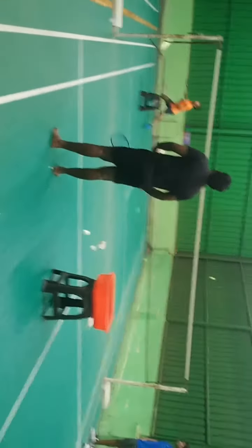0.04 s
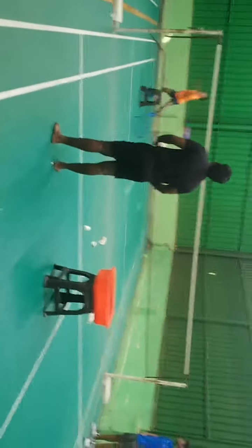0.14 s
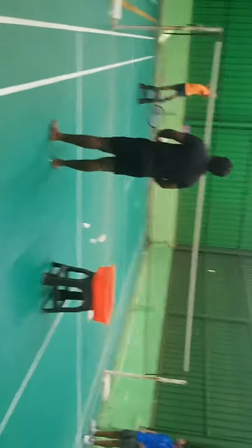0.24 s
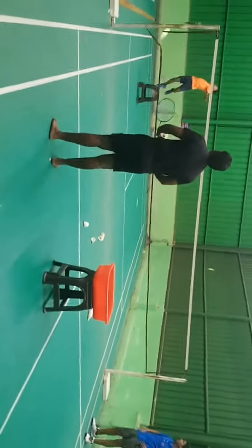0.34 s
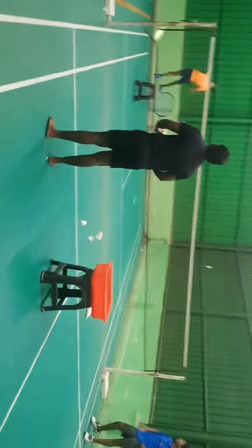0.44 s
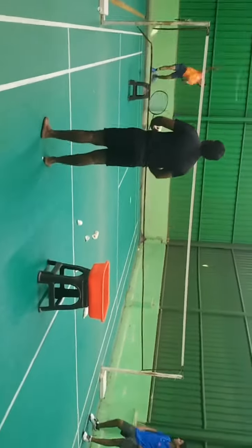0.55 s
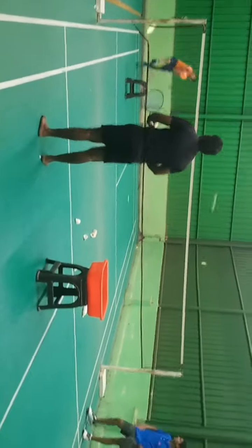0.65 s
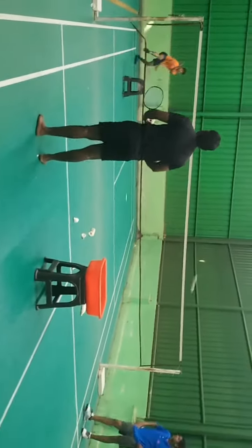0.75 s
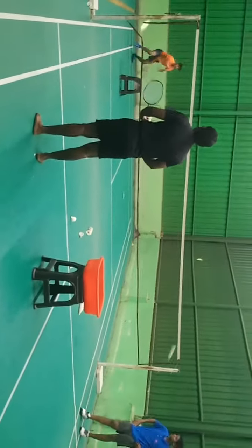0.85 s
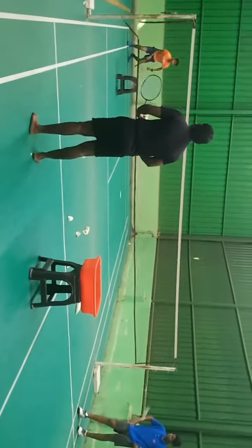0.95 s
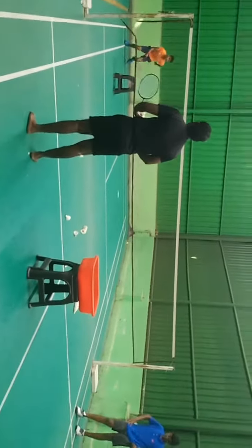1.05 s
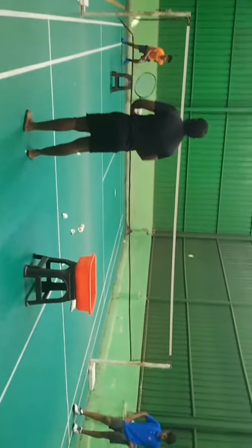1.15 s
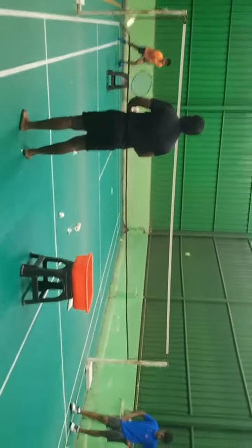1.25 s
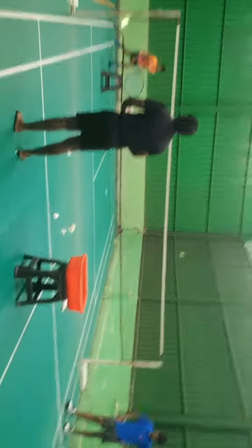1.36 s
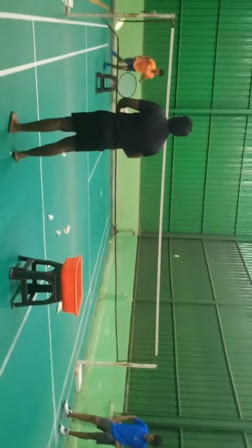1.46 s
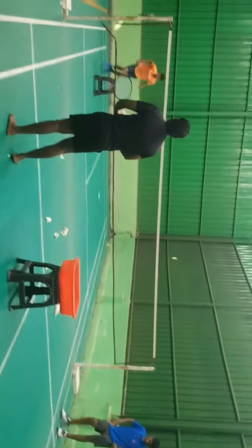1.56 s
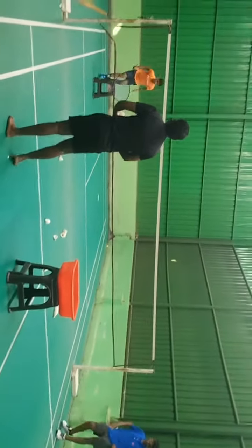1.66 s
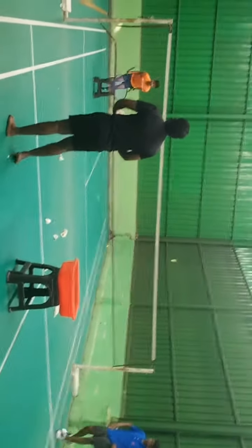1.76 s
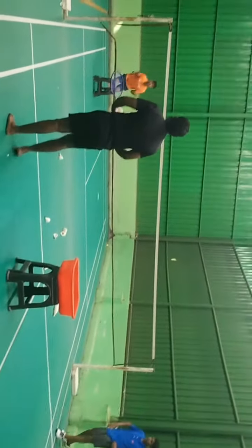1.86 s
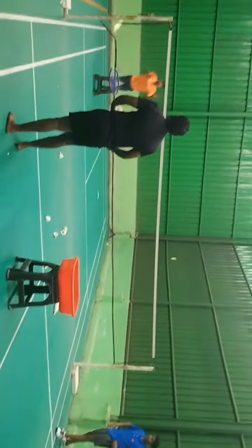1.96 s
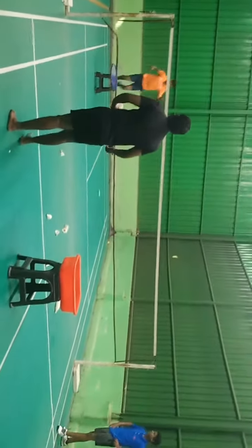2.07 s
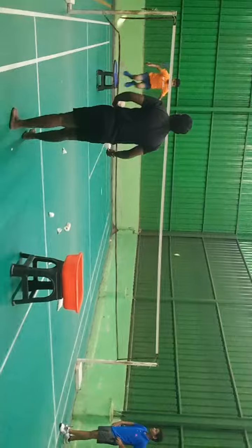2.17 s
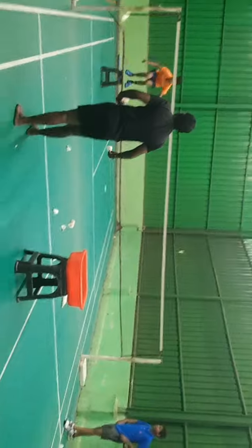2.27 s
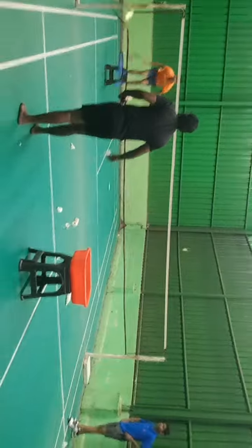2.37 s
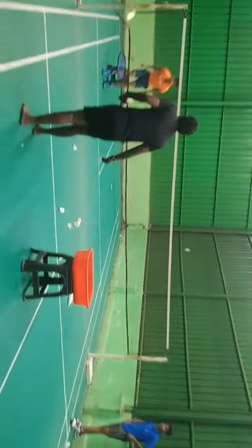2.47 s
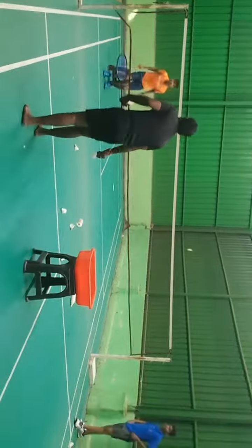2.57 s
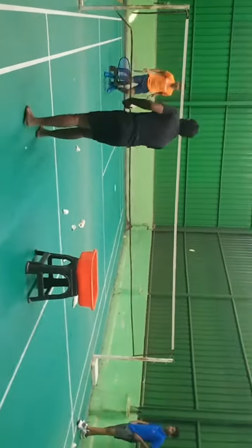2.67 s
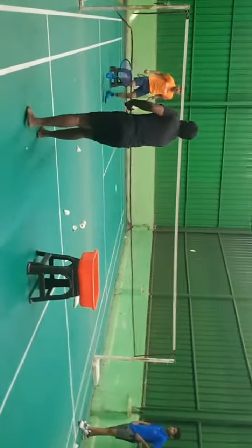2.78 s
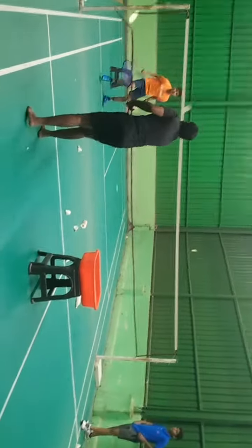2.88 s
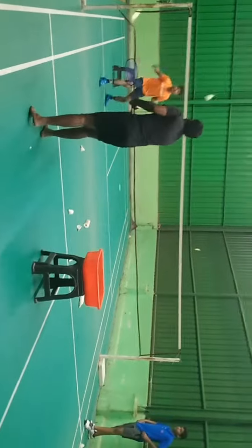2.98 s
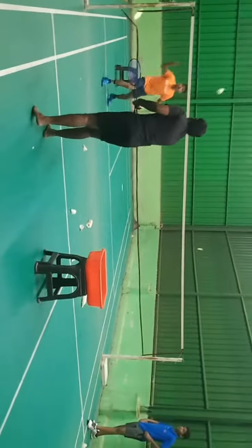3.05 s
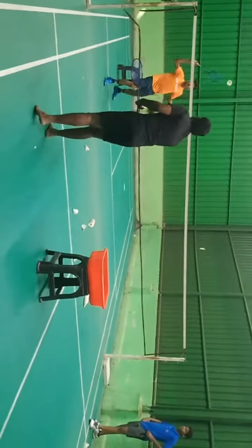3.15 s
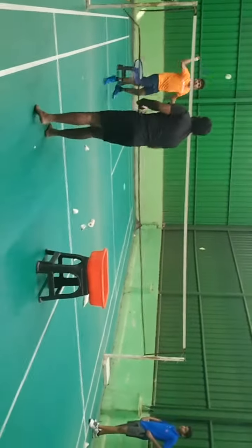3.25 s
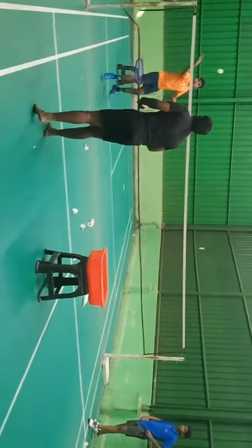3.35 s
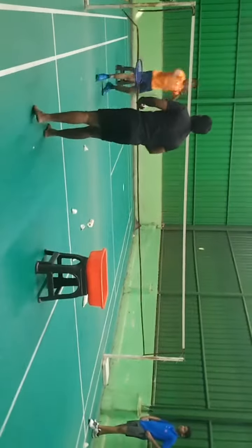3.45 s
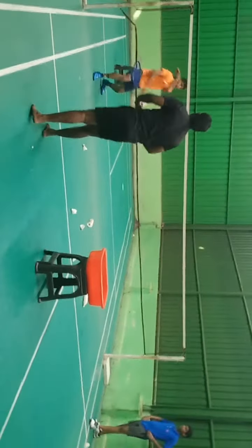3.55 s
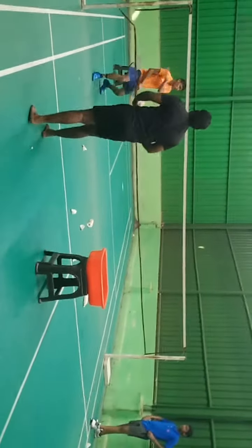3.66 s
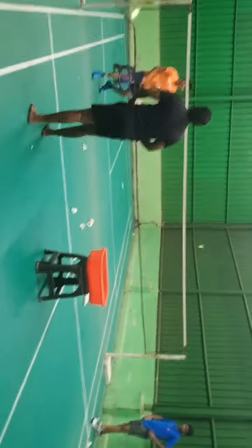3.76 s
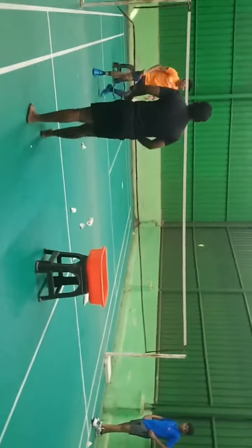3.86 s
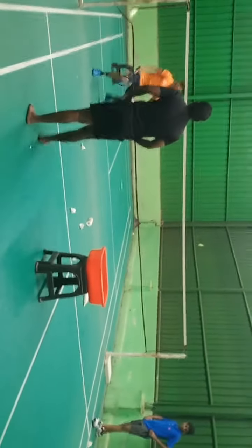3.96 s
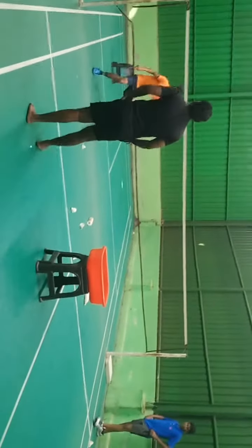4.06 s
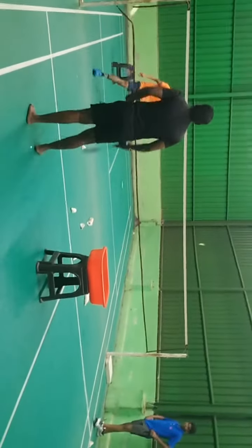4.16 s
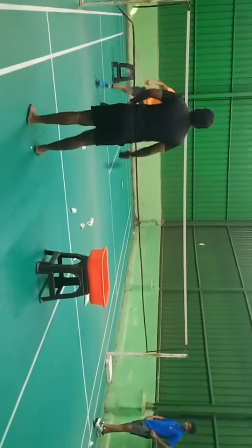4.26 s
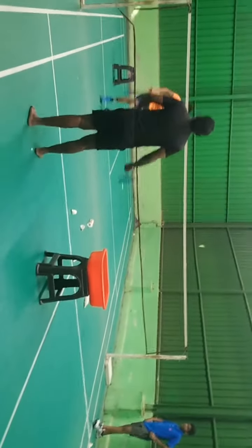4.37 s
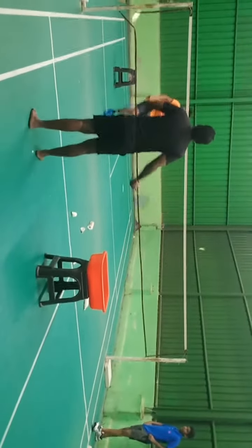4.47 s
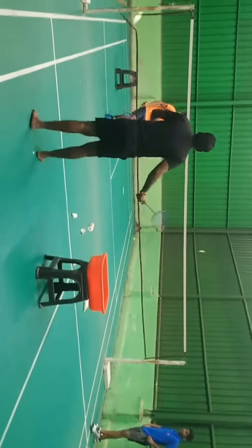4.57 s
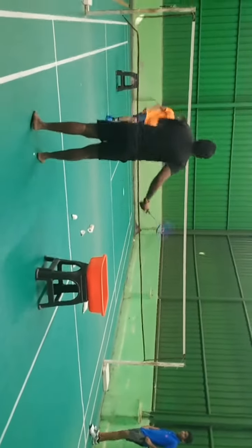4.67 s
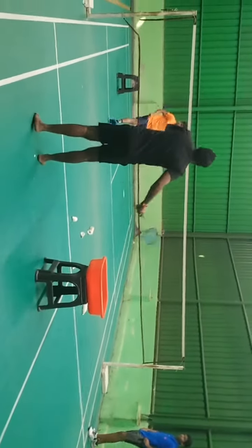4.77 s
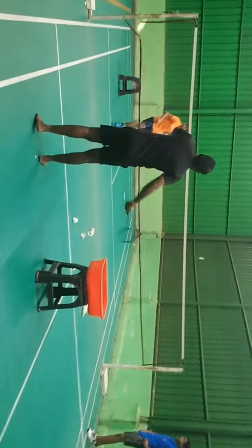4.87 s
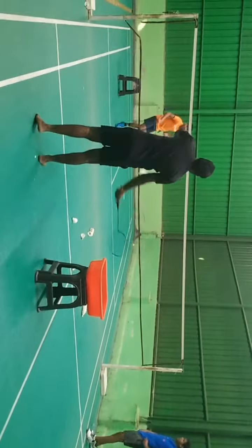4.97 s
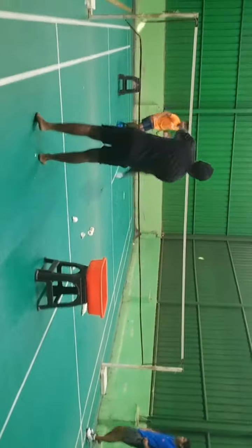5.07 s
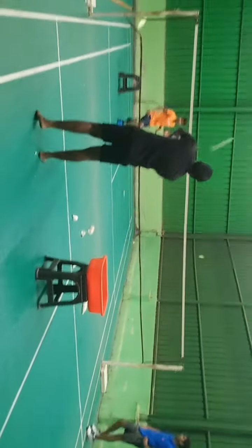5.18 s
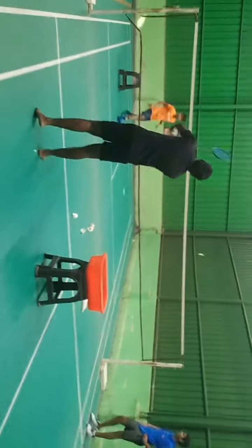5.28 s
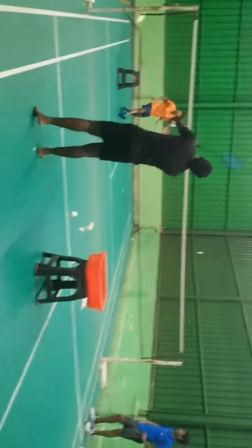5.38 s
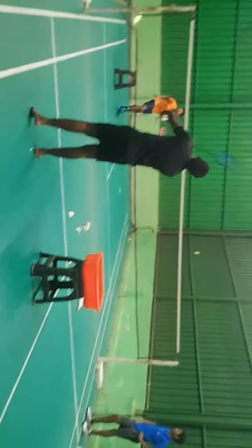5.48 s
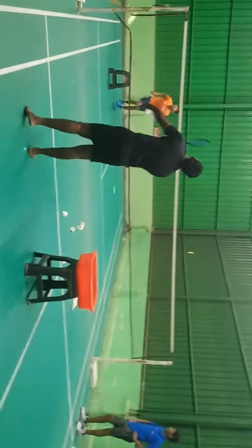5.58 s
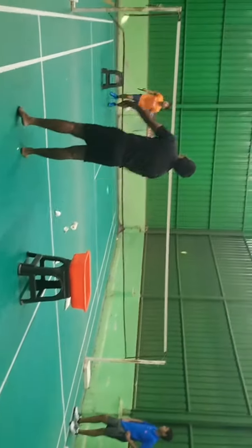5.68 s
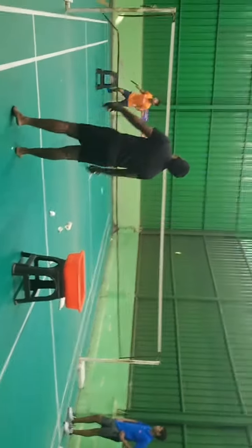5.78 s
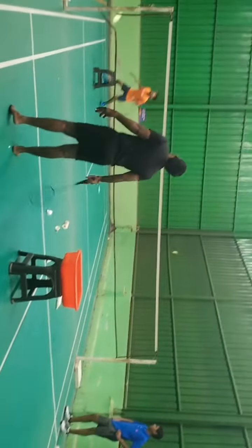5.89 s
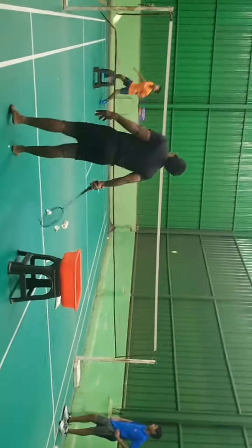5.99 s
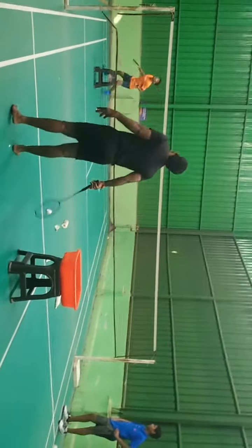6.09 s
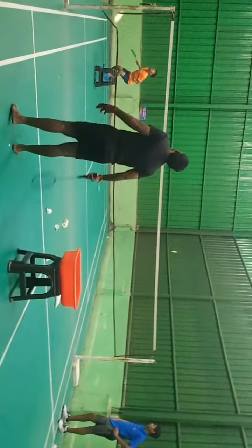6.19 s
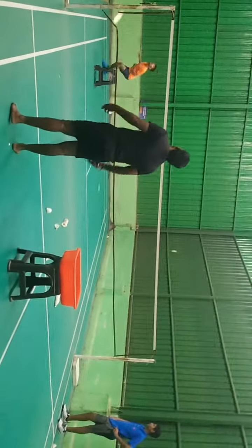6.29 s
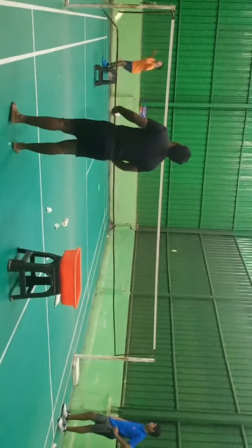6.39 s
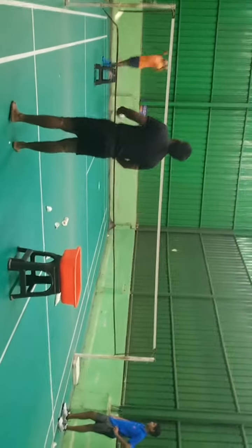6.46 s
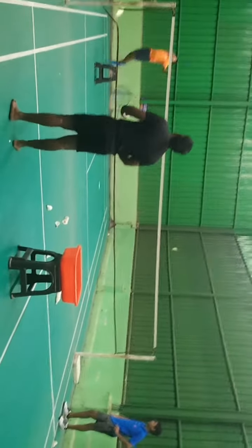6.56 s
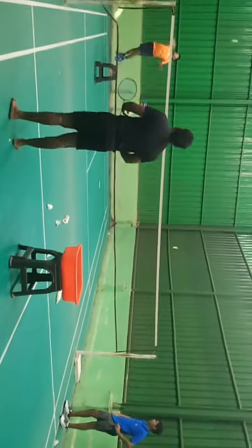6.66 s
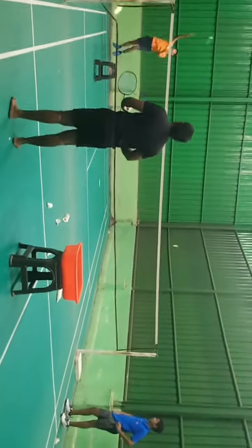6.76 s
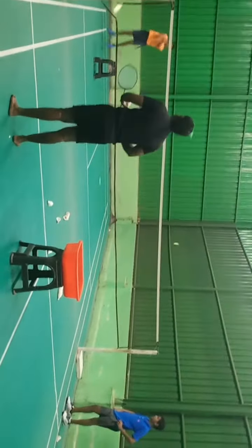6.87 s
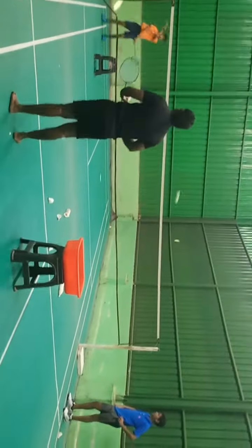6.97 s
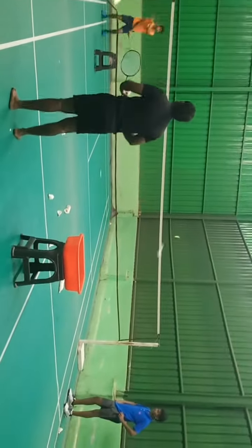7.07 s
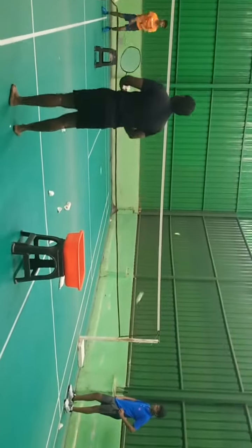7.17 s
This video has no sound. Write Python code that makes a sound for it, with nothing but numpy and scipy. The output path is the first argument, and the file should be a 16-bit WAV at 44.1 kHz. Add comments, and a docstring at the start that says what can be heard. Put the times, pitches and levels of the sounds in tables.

```python
"""Badminton drill in a large bare hall

Rackets swish and strike the shuttle: its cork thuds, its feathers crack and the strings ring.
Rubber soles stick and slip into squeaks, feet shake a springy floor, and small things rustle close by.
Every sound is short, but the hall rings on for seconds over a steady hush.
A phone holds the loud moments down and turns the faint ones down further."""
import sys
import numpy as np
from scipy import signal
from scipy.fft import rfft, irfft, next_fast_len
from scipy.io import wavfile
from scipy.ndimage import uniform_filter1d

SR = 44100
rng = np.random.default_rng(int(sys.argv[2]) if len(sys.argv) > 2 else 0)


def materialize(psi):
    """Save the field psi as 16-bit PCM at rate SR to the path in sys.argv[1].

    A 1-D psi becomes a single channel; in a 2-D psi each row is a channel.
    """
    bounded = np.clip(np.atleast_2d(psi).T, -1, 1)
    quanta = np.round(bounded * 32767).astype(np.int16)
    wavfile.write(sys.argv[1], SR, quanta)


N = 318843
LEAD_S = 1   # tracks begin early, so the hall is already ringing at time zero


def from_db(db):
    """Turn decibels into a number to multiply a sound by."""
    return 10 ** (np.asarray(db) / 20)


def unit_energy(x):
    """Scale a sound so that its total energy is 1."""
    return x / np.sqrt(np.sum(x ** 2) + 1e-20)


def at_hz(points, hz):
    """Read a curve of (pitch [Hz], value) points at any pitch."""
    pitches, values = np.transpose(points)
    return np.interp(np.log(np.maximum(hz, 1)), np.log(pitches), values)


def silence():
    """An empty track, with room for the early start."""
    return np.zeros(N + round(LEAD_S * SR))


def add(track, s, sound):
    """Mix a sound into a track at s seconds."""
    i = max(round((s + LEAD_S) * SR), 0)
    track[i:i + len(sound)] += sound[:len(track) - i]


def band(x, low_hz, high_hz):
    """Keep the part of a sound between two pitches."""
    sos = signal.butter(2, [low_hz, min(high_hz, .45 * SR)], "band", fs=SR, output="sos")
    return signal.sosfilt(sos, x)


def coloured(x, points):
    """Shape a sound by a curve of (pitch [Hz], gain [dB]) points."""
    size = next_fast_len(x.shape[-1])
    gain = from_db(at_hz(points, np.fft.rfftfreq(size, 1 / SR)))
    return irfft(rfft(x, size) * gain, size)[..., :x.shape[-1]]


def stereo_noise(size, fade_times=None):
    """Noise alike in both ears in the bass; given fade times, each pitch dies at its own rate."""
    # how alike left and right are: (pitch [Hz], likeness [0-1])
    likeness = [(60, 1), (150, 0.86), (300, 0.96), (600, .3), (1200, 0.017), (16000, 0.029)]
    hz, t, (mid, side) = signal.stft(rng.standard_normal((2, size)), SR, nperseg=512)
    alike = at_hz(likeness, hz)[:, None]
    mid, side = mid * np.sqrt((1 + alike) / 2), side * np.sqrt((1 - alike) / 2)
    fade = 1 if fade_times is None else from_db(-60 * t / at_hz(fade_times, hz)[:, None])
    return signal.istft(np.array([mid + side, mid - side]) * fade, SR, nperseg=512)[1][:, :size]


def hush():
    """A faint, steady, mostly low noise behind everything."""
    # tone of the hush: (pitch [Hz], relative level [dB])
    tone = [(30, -26), (90, -1.8), (250, -2), (600, -5), (1200, -5), (2200, -13.5), (5000, -27.5),
            (8000, -25), (16000, -29)]
    noise = coloured(stereo_noise(N), tone)
    return from_db(-50.5) * noise / np.std(noise)


def hall(x):
    """Echoes thicken over the first hundredths of a second into a long, smooth tail."""
    # how long the hall rings: (pitch [Hz], time to fade by 60 dB [s])
    fade_times = [(60, 2.4), (150, 2.14), (400, 2.85), (1000, 3.02), (2200, 4.42), (4000, 3.1),
                  (7000, 2.12), (11000, 1.01), (16000, 0.9)]
    build_s = .017
    t = np.arange(4 * SR) / SR
    tail = stereo_noise(len(t), fade_times) * (1 - np.exp(-(t / build_s) ** 2))
    return signal.fftconvolve(x[None], tail, axes=1)[:, :len(x)]


def ticks():
    """Brief puffs of high noise, too faint to make the hall ring."""
    # ticks and rustles close by: (time [s], level [dB], fall time [s], lowest pitch [Hz])
    puffs = [(.130, -33, .002, 900), (.131, -36, .002, 12000), (.150, -42, .003, 12000),
             (.150, -44, .04, 10000), (.4386, -29.5, .001, 10000), (.524, -28.5, .001, 8000),
             (.950, -38, .01, 12000), (1.208, -30, .006, 12000), (1.335, -30.5, .04, 10000),
             (1.413, -36, .002, 6000), (1.640, -42, .015, 8500), (2.504, -31, .0024, 12000),
             (2.670, -35, .03, 13000), (2.834, -41, .004, 11000), (3.028, -42, .005, 12000),
             (3.679, -31, .02, 13000), (3.920, -33, .022, 13000), (4.500, -53, .05, 11000),
             (4.729, -32, .0022, 7500), (4.881, -24, .003, 7000), (4.951, -45, .0034, 8000),
             (5.771, -42.5, .035, 8000), (6.451, -46, .07, 7500)]
    even_s = .045   # a puff with this fall time rises just as slowly; shorter ones start more sharply
    out, t = np.array([silence(), silence()]), np.arange(SR // 3) / SR
    for s, db, fall, low_hz in puffs:
        rise = fall * np.sqrt(fall / even_s)
        shape = np.minimum(t / rise, 1) ** 2 * np.exp(-np.maximum(t - rise, 0) / fall)
        for channel in out:
            hiss = band(band(rng.standard_normal(len(t)), low_hz, 17000), low_hz, 17000)
            add(channel, s, from_db(db) * hiss * shape)
    return out


def steps():
    """Each landing shakes the springy floor around its own low pitch, and the sole claps."""
    # feet landing, and low thumps repeating shortly after: (time [s], level [dB], floor pitch [Hz])
    landings = [(.082, -49, 105), (.797, -22, 105), (.812, -15.5, 100), (.925, -25, 103), (1.030, -22, 96),
                (1.200, -33, 101), (1.410, -43, 90), (1.656, -45.5, 100), (1.876, -30, 123),
                (2.002, -39, 92), (2.559, -19, 101), (2.574, -18, 98), (2.650, -24, 95), (2.770, -27, 98),
                (3.590, -24, 94), (3.920, -36.5, 92), (4.160, -39.5, 100), (4.652, -49, 91),
                (5.182, -40, 96), (5.375, -38, 97), (5.470, -41.5, 100), (5.876, -37, 135),
                (6.002, -46, 78), (6.428, -39, 105), (6.565, -45, 82), (6.635, -45, 80),
                (7.043, -20.5, 101), (7.168, -25.5, 101)]
    shake_s = .032
    near, to_hall, t = silence(), silence(), np.arange(SR // 2) / SR
    click = 1. * (t == 0)
    for s, db, hz in landings:
        rattle = band(band(rng.standard_normal(len(t)), .4 * hz, 2.1 * hz), 30, 2.3 * hz)
        boards = np.sin(2 * np.pi * hz * t) + 8 * rattle
        shape = t / shake_s * np.exp(1 - 1.22 * t / shake_s)
        add(near, s, from_db(db) * boards * shape)
        clap_db = -19.5 + .8 * db   # light steps clap a little louder for their weight
        clap = from_db(clap_db) * unit_energy(band(click, 330, 507))
        boom = from_db(db - 7.8) * unit_energy(band(click, .33 * hz, 1.9 * hz))
        add(to_hall, s, clap + boom)
    return near + hall(to_hall)


def squeaks():
    """Rubber sticks and slips: a stack of tones settles on a pitch and wavers, over rubbing noise."""
    # slipping soles: (time [s], length [s], settled pitch [Hz], starts higher by [share],
    # settling time [s], final sag [share], waver [share], level [dB], direct sound over hall [dB],
    # second tone [dB], third tone [dB], flutter of upper tones [0-1], rubbing against the tones [dB],
    # extra for the second tone heard directly [dB])
    slips = [(.074, .034, 1830, .25, .02, .01, .07, -44, 31, -20, -24, .5, -16, 3),
             (1.858, .030, 2420, .055, .009, .15, .012, -12.5, 11, -14, -21, .6, -19, 17),
             (2.921, .034, 1860, .07, .015, .03, .03, -25, 19, -12, -23, .6, -14, 4),
             (3.470, .03, 2090, .05, .01, .04, .04, -29, 5, -0.5, -30, .6, -18, 10),
             (5.404, .046, 2903, .1, .0085, .004, .003, -21, 22, -16, -36, .15, -20, 3),
             (5.811, .034, 2080, -.07, .015, -.04, .045, -35, 6, -10, -29, .7, -13, 8),
             (5.834, .034, 2480, -.05, .015, .005, .02, -35.5, 15, -30, -30, .7, -13, 8)]
    grip_s, let_go_s, flutter_hz = .004, .012, 300
    tone_loss_db, upper_boost_db = 5, 10   # upper tones weaken one by one, but are stronger heard directly
    near, to_hall = silence(), silence()
    for (s, length, hz, glide, settle, sag, waver, db, direct_db,
         second_db, third_db, chatter, rub_db, octave_db) in slips:
        t = np.arange(round(length * SR)) / SR
        wander = uniform_filter1d(rng.standard_normal(SR // 5), size=200)[:len(t)] * np.sqrt(200)
        pitch = hz * (1 + glide * np.exp(-t / settle) - sag * (t / length) ** 3 + waver * wander)
        phase = 2 * np.pi * np.cumsum(pitch) / SR
        ramp = np.minimum(t / grip_s, (length - t) / let_go_s)
        shape = np.sin(np.pi / 2 * np.minimum(ramp, 1)) ** 2
        tones = np.sin(np.outer(np.arange(1, 7), phase)) * shape
        flutter = band(rng.standard_normal((4, SR // 5)), 30, flutter_hz)   # the grip is unsteady
        tones[2:] *= 1 - chatter + chatter * flutter[:, :len(t)] / np.std(flutter)
        levels_db = [0, second_db] + [third_db - tone_loss_db * k for k in range(4)]
        tones = from_db(db) * unit_energy(from_db(levels_db)[:, None] * tones)
        rub = band(rng.standard_normal(SR // 5), .72 * hz, 1.3 * hz)[:len(t)] * shape
        add(to_hall, s, tones.sum(0) + from_db(db + rub_db) * unit_energy(rub))
        add(near, s, from_db(direct_db + np.array([0, octave_db] + [upper_boost_db] * 4)) @ tones)
    return near + hall(to_hall)


def swings():
    """A racket cuts the air with a swelling rush; its strings whistle briefly at top speed."""
    # swings: (end [s], rush [dB], whistle [dB], whistle peak before the end [s], its half-width [s])
    strokes = [(.639, -23, -28.5, .016, .0037), (5.191, -24, -50, .013, .004),
               (6.869, -28, -31, .012, .009)]
    swing_s, whistle_hz = .065, 880
    out, t = np.array([silence(), silence()]), np.arange(round(swing_s * SR)) / SR
    for s, rush_db, whistle_db, early, width in strokes:
        swell = np.exp(-((t - swing_s + early) / width) ** 2)
        whistle = from_db(whistle_db) * np.sin(2 * np.pi * whistle_hz * t) * swell
        for channel in out:
            rush = band(rng.standard_normal(SR // 5), 500, 12000)[:len(t)] * (t / swing_s) ** 4.5
            add(channel, s - swing_s, from_db(rush_db) * rush + whistle)
    return out


def racket_hits():
    """Cork thuds, strings ring and feathers crack, heard directly, off floor and walls, and in the hall."""
    # racket hits and one slapping sole: (time [s], level into hall [dB], direct sound over hall [dB],
    # wall echo delay [s], echo level [dB], echo top pitch [Hz], string pitch [Hz],
    # strings over crack [dB], their time to fade by 60 dB [s], direct strings over hall [dB],
    # extra thud [dB], extra knock [dB], extra snap [dB], extra treble [dB])
    hits = [(-.9, -29.5, 5, .017, -6, 4500, 1000, -2, .12, 5, 3.5, 1.5, -6, 14),
            (.6375, -20, 22.5, .017, 3, 5000, 1065, 2.5, .025, 14, 1.2, 2, -1.6, 0.3),
            (2.556, -23.5, 9, .043, 9, 2000, 1100, -4.5, .01, 15.5, .5, -4, -.3, -8),
            (3.4645, -23, 20, .0215, 1.5, 16000, 1010, -5.5, .04, 17, -1.5, -2.5, 3.2, .3),
            (5.189, -34.5, 24, .017, -16, 4500, 1028, .6, .14, 36, .5, -10, -.8, 2.2),
            (6.868, -22.5, 23.5, .0175, 0.5, 7000, 960, -.5, .01, 21, -.8, -.5, 1.6, 1.3)]
    # tones of frame and strings: (pitch [times the string pitch], share in hall [dB], direct share [dB])
    string_tones = [(.42, -14, -30), (1, -3, -.5), (1.065, -1.5, -22), (1.52, -16, -10), (1.65, -11, -12),
                    (1.9, -16, -12)]
    # a hit's cork thud, body, knock, crack, snap, hiss and airy top:
    # (low edge [Hz], high edge [Hz], level over the crack [dB], extra when heard directly [dB])
    hit_parts = [(170, 330, -11.5, 6.5), (300, 720, -5.5, 1.5), (620, 1000, -7.3, 5), (1450, 2650, 0, -2.5),
                 (2800, 4580, -1.2, .3), (4600, 7690, -2.8, 1.5), (8000, 17000, -1.2, 1.5)]
    flap_rise_s, flap_fall_s, contact_db = .0006, .003, 12
    near, to_hall, t = silence(), silence(), np.arange(SR // 5) / SR
    click = 1. * (t == 0)
    multiple, in_hall_db, in_direct_db = np.transpose(string_tones)
    for (s, db, direct_db, echo_s, echo_db, echo_hz, hz, strings_db, fade_s, ring_db,
         thud_db, knock_db, snap_db, treble_db) in hits:
        tone_time = np.outer(multiple, t)   # higher tones swing faster and die sooner
        tones = np.sin(2 * np.pi * hz * tone_time) * from_db(-60 * tone_time / fade_s)
        add(to_hall, s, from_db(db + strings_db) * unit_energy(from_db(in_hall_db) @ tones))
        ring = band(from_db(in_direct_db) @ tones, 230, 5000)
        direct = from_db(db + strings_db + ring_db) * unit_energy(ring)
        flap = rng.standard_normal(len(t)) * (1 - np.exp(-t / flap_rise_s)) * np.exp(-t / flap_fall_s)
        flap[round(flap_rise_s * SR)] += from_db(contact_db)   # first contact clicks over the feathers
        extras_db = [thud_db, thud_db, knock_db, 0, snap_db, .25 * treble_db, treble_db]
        for (*edges, part_db, boost_db), extra_db in zip(hit_parts, extras_db):
            level_db = db + part_db + extra_db
            add(to_hall, s, from_db(level_db) * unit_energy(band(band(click, *edges), *edges)))
            part = unit_energy(band(band(flap, *edges), *edges))
            direct += from_db(level_db + direct_db + boost_db) * part
        add(near, s, direct)
        add(near, s + .011, from_db(-8) * direct)   # echo off the floor
        add(near, s + echo_s, from_db(echo_db) * band(direct, 100, echo_hz))   # off the nearest wall
        add(near, s + .032, from_db(echo_db + 4) * band(direct, 150, 1200))   # the far wall's thud
    return near + hall(to_hall)


def scene():
    """The players' sounds over the hush, from time zero on."""
    background = hush()
    court = racket_hits() + swings() + squeaks() + steps() + ticks()
    return background + court[:, -N:]


def hold_down(x):
    """Automatic volume control: quick to turn loud moments down, slower to let go."""
    limit_db, cut_share, release_db_per_s, attack_s = -23, .31, 72.5, .006
    level_db = 10 * np.log10(uniform_filter1d(np.mean(x ** 2, 0), size=128) + 1e-12)
    ramp = release_db_per_s * np.arange(N) / SR
    held_db = np.maximum.accumulate(level_db + ramp) - ramp   # each peak sinks back at a steady rate
    over_db = np.maximum(held_db - limit_db, 0)
    memory = np.exp(-1 / (attack_s * SR))
    return x * from_db(-cut_share * signal.lfilter([1 - memory], [1, -memory], over_db))


def gate(x):
    """Noise reducer: each pitch is turned down once its recent power sinks to a threshold."""
    # what counts as faint: (pitch [Hz], threshold [dB])
    thresholds = [(40, -84.5), (120, -51.5), (500, -62), (1200, -59.5), (2200, -70.5), (5000, -80.5),
                  (7600, -103), (8400, -80), (16000, -70)]
    # the deepest cut: (pitch [Hz], gain [dB])
    deepest_cut = [(100, -12), (1000, -10), (7000, -9), (10000, -11.5)]
    memory = .6
    hz, _, spectrum = signal.stft(x, SR, nperseg=1024)
    power_now = uniform_filter1d(np.mean(np.abs(spectrum) ** 2, 0), size=3, axis=0)
    power = np.maximum(power_now, signal.lfilter([1 - memory], [1, -memory], power_now, axis=1))
    share_above = np.maximum(1 - from_db(2 * at_hz(thresholds, hz))[:, None] / (power + 1e-18), 0)
    gain = np.maximum(share_above ** .62, from_db(at_hz(deepest_cut, hz))[:, None])
    return signal.istft(spectrum * gain, SR, nperseg=1024)[1][:, :N]


def record(dry):
    """A phone: two microphone openings, volume control, noise reducer and a cut of the highest treble."""
    # balance of the two openings: (pitch [Hz], left over right [dB])
    balance = [(60, 1.5), (130, -.8), (290, 1.5), (640, -2.5), (1410, 4), (2400, 7), (3400, 5), (6820, 1.5),
               (15000, 4)]
    # tone of the microphone: (pitch [Hz], gain [dB])
    mic_tone = [(25, -20), (50, -13), (72, -0.5), (95, 2.5), (550, -4), (1000, 3.3), (1400, 0.5),
                (2300, -0.16), (5200, -3), (7200, 3.7), (10000, -4), (15000, -1), (15700, -1.5),
                (16000, -9)]
    cutoff_hz = 16950
    half = np.array(balance) * [1, .5]
    both_sides = np.array([coloured(dry[0], half), coloured(dry[1], half * [1, -1])])
    controlled = gate(hold_down(coloured(both_sides, mic_tone)))
    return signal.sosfilt(signal.cheby2(14, 70, cutoff_hz, fs=SR, output="sos"), controlled)


dry = scene()
out = record(dry)
materialize(out)
```